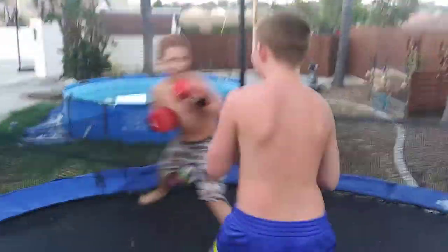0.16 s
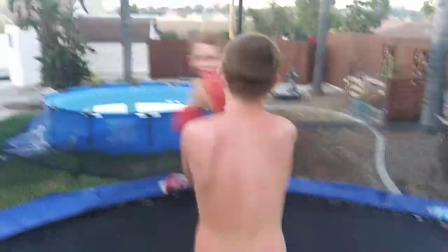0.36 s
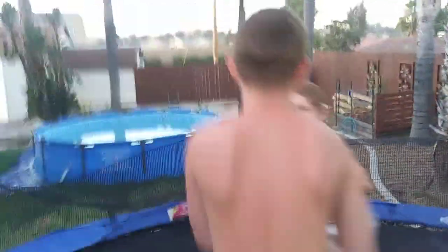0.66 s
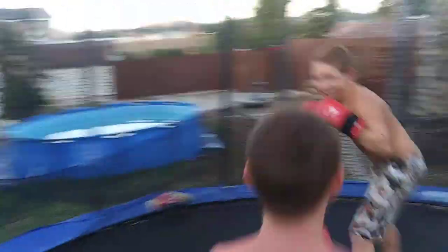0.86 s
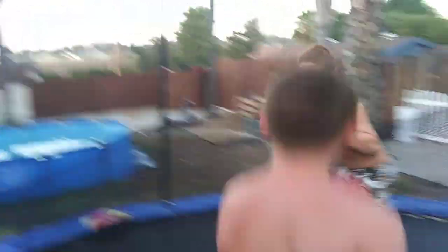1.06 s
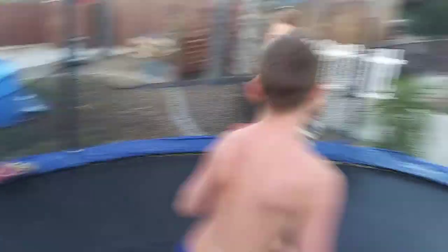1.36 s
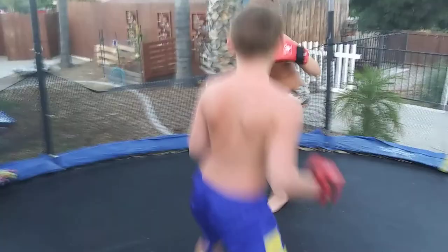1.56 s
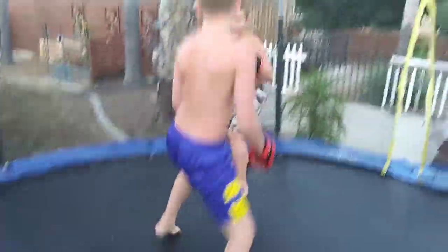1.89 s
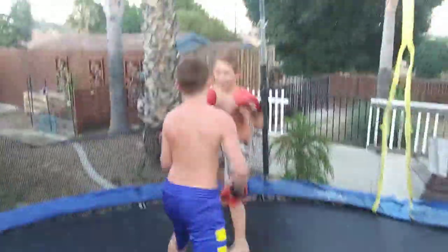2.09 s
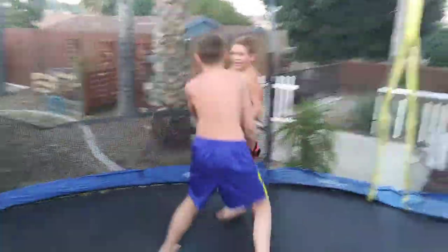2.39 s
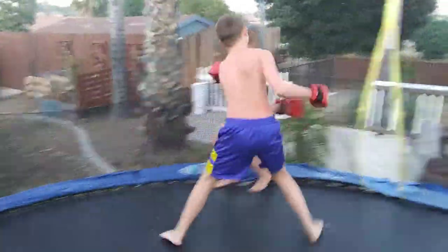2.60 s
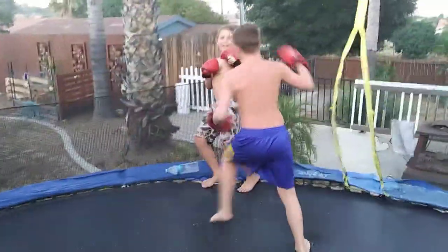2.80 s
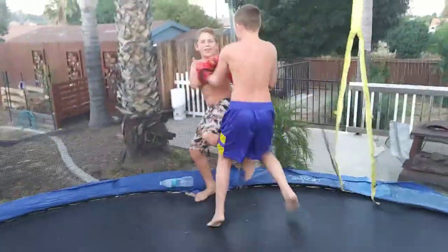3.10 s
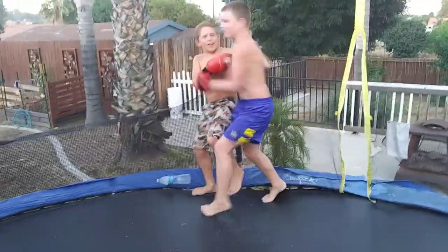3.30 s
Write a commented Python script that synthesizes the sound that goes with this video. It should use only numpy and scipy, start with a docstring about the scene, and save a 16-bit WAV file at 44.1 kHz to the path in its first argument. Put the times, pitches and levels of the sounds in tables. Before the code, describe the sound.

A trampoline rustles close by throughout, with feet scuffing the mat and springs rattling and ringing irregularly. Brief squeaks come at about 0.2 and 1.1 seconds, a light padded punch at 0.3, and sharp clicks at 0.9 and 2.4. Soft footfalls thud now and then. Boxing gloves hit again around 3 seconds, hardest at 3.3, with faint echoes from the yard.

```python
"""Backyard trampoline, close up: two people spar with boxing gloves.
Feet scuff the woven mat in dense tiny slips and land with soft thuds, over a lasting fine rustle.
Hooks chatter on the frame and stick-slip into squeaks; the steel springs zing and ring on.
A few padded punches ring damped glove modes, the hardest near the end.
Ground and fences return faint echoes."""
import sys
import numpy as np
from scipy import signal
from scipy.fft import rfft, irfft
from scipy.io import wavfile
from scipy.ndimage import map_coordinates

SR = 44100
rng = np.random.default_rng(int(sys.argv[2]) if len(sys.argv) > 2 else 0)


def to_wav(s):
    """Save 16-bit WAV."""
    ch = np.atleast_2d(s).T  # columns
    pcm = np.round(np.clip(ch, -1, 1) * 32767)  # PCM
    wavfile.write(sys.argv[1], SR, pcm.astype(np.int16))


N = 152145
TIME_S = np.arange(N) / SR

# Foot swishes on the mat: start_s, length_s, level_db, treble_db, mid_db
SCUFFS = [(-.02, 0.052, -40, -14, 6.5), (0.058, 0.11, -36.5, -8, 4), (0.215, 0.066, -33.5, -3, 4.5),
          (0.289, 0.063, -39.5, -2, 5), (0.356, 0.028, -31.5, -2.5, 5.5), (0.403, 0.047, -45, 4.5, 5),
          (0.536, 0.06, -44.5, 7, 1), (0.605, 0.057, -34, 2.5, -1.5), (0.756, 0.054, -37, 2, -1),
          (0.844, 0.041, -33, -7, 0), (0.891, 0.034, -33, -1, 1.5), (0.942, 0.051, -36, 1, 1),
          (1.084, 0.1, -38, -6.5, -7), (1.231, 0.058, -37, 3, 2.5), (1.383, 0.042, -34.5, 3, -1.5),
          (1.537, 0.051, -41.5, 8, 5), (1.603, 0.1, -43, 2, 1.5), (1.822, 0.045, -38, 0.5, -2),
          (2.044, 0.25, -43.5, -0.5, 2), (2.151, 0.071, -36.5, 6, 0.5), (2.453, 0.059, -30, 0, 0.5),
          (2.53, 0.055, -35.5, 3, -2), (2.569, 0.054, -27, -4, 3), (2.632, 0.14, -34.5, -1, 2),
          (2.708, 0.12, -33.5, -0.5, -2.5), (2.944, 0.081, -34, -2.5, -2.5), (3.213, 0.11, -42, -3, 5.5),
          (3.32, 0.0097, -28, -3, 1.5), (3.338, 0.074, -46, 4, 10)]
# Spectrum of scuffs, rattles and clicks: freq_hz, level_db
CONTACT_SPECTRUM = [(40, -60), (110, -38.5), (250, -29.5), (500, -15.5), (1000, -5.5), (1800, -1),
                    (2700, 1.5), (3400, -2), (4300, 3), (5700, 2), (6600, -1), (7500, -5.5), (10500, -9),
                    (13000, -16.5), (16000, -24.5)]
# Rustle spectrum: freq_hz, level_db
RUSTLE_SPECTRUM = [(30, -46), (109, -29), (311, -5), (962, 0.5), (1760, 2), (2060, 2.5), (2900, 2.5),
                   (3220, -2.5), (6380, 0.5), (7470, -10), (8520, -7), (16000, -25)]
# Rustle contour: time_s, level_db
RUSTLE_LEVELS = [(0, -41.5), (.35, -43), (.52, -45), (.7, -41.5), (.95, -45.5), (1.05, -46), (1.22, -43),
                 (1.37, -43), (1.525, -48), (1.6, -45.5), (1.95, -46.5), (2.25, -44), (2.38, -43.5),
                 (2.8, -42), (2.9, -45.5), (3.05, -39), (3.19, -46), (3.45, -44)]
# Coil resonances: freq_hz, gain_db
SPRING_MODES = [(980, -2), (1500, -0.5), (1728, -6), (2116, -8), (2848, -3), (3252, 1), (5340, 4),
                (10314, 1.5)]
# Single coils grinding: start_s, length_s, centre_hz, level_db, half_width_ratio
ZINGS = [(.104, 0.029, 2210, -31.5, 0.12), (.106, 0.019, 4120, -35.5, .08), (0.223, 0.045, 4000, -39, .05),
         (0.222, 0.051, 7300, -41.5, 0.092), (0.768, 0.041, 10900, -47, .09),
         (0.858, 0.15, 10800, -46, 0.086), (0.895, 0.026, 2980, -37.5, 0.038),
         (0.892, 0.032, 5270, -34.5, 0.033), (1.245, 0.063, 8100, -40.5, 0.21)]
# Hooks chattering on the frame: start_s, level_db, treble_db, mid_db
RATTLES = [(.107, -32, -3, 2.5), (.484, -36.5, -7, 0), (.851, -32, 4, 5.5), (.864, -29.5, 4.5, -7),
           (1.16, -33.5, 5, -5), (1.537, -41, 4, -4), (1.754, -37.5, -0.5, -24), (1.869, -32, -3, -9),
           (2.032, -28, 3, -1), (2.096, -38.5, 10.5, -6), (2.163, -29, -1, 2), (2.758, -29.5, -12, 0),
           (2.78, -28.5, 4.5, -0.5), (2.821, -33.5, 3, -1), (3.036, -28, 3, -1), (3.086, -30.5, 4, -2),
           (3.356, -32.5, 5, 3), (3.377, -29.5, -2.5, 1.5)]
# Hook stick-slip: start_s, length_s, start_hz, end_hz, level_db, peak_hz, falloff_db_per_octave
SQUEAKS = [(0.179, 0.029, 878, 848, -31.5, 1800, 11.5), (1.089, 0.043, 553, 515, -38.5, 4750, 6.5),
           (1.14, 0.0295, 512, 504, -39.5, 4100, 6.5), (1.979, 0.017, 2400, 2280, -42, 2820, 2)]
# Single dry clicks: start_s, level_db, treble_db, mid_db
CLICKS = [(.2998, -29.5, -1, 12), (.8695, -20.5, 3, -13), (2.3708, -30, -8, -14), (2.4088, -27.5, -7, -22),
          (2.428, -26, -4, -2.5), (2.449, -25.5, -1, 2)]
# Glove contacts: start_s, drive_db, pitch_hz, cutoff_hz
PUNCHES = [(0.3166, -21.5, 476, 1770), (2.95, -27, 750, 1500), (3.0629, -15.5, 1034, 1800),
           (3.0726, -17.5, 700, 1500), (3.2749, -5.5, 712, 3920), (3.2800, -11, 926, 1820),
           (3.2885, -17, 840, 1800), (3.3168, -27.5, 800, 2500), (3.3375, -20.5, 950, 2500)]
# Modes of a glove on skin: pitch_ratio, level_db, t60_s
GLOVE_MODES = [(.88, -4.5, 0.0083), (1.36, -2, 0.0069), (2.1, -10.5, 0.018), (3.7, -12, 0.0053),
               (6.0, 0.5, 0.002)]
# Feet sinking into the mat: start_s, level_db
THUDS = [(.366, -42), (1.245, -42), (2.163, -37.5), (2.196, -43.5), (2.934, -36.5), (3.064, -40)]
# Mat flap spectrum: freq_hz, level_db
THUD_SPECTRUM = [(30, -38), (90, -46), (160, -18.5), (240, -6), (800, -1.5), (1300, -8.5), (2500, -11),
                 (8000, -35)]
# Hollow knock modes: freq_hz, level_db
KNOCK_MODES = [(990, -23), (406, -31)]
# Ground and fence reflections: delay_s, gain_db
ECHOES = [(.0093, -23.5), (0.024, -17.5), (0.048, -15.5)]


def from_db(db):
    """Decibels to gain."""
    return 10 ** (np.asarray(db) / 20)


def unit_rms(x):
    """Scale to rms 1."""
    return x / np.sqrt(np.mean(x ** 2) + 1e-20)


def db_at(spectrum, hz):
    """Interpolate a spectrum over log frequency."""
    knot_hz, knot_db = np.transpose(spectrum)
    return np.interp(np.log(hz + 1), np.log(knot_hz), knot_db)


def wander(x):
    """Smooth random curve, spread about 1, one knot per unit of x."""
    return map_coordinates(rng.standard_normal(4096), [x], order=3, mode="wrap")


def butter(x, cutoff_hz, kind, order=2):
    """Causal low- or high-pass."""
    return signal.sosfilt(signal.butter(order, cutoff_hz, kind, fs=SR, output="sos"), x)


def add(out, start_s, x):
    """Mix x into out at start_s."""
    i = int(round(start_s * SR))
    x = x[max(-i, 0):max(N - i, 0)]
    out[max(i, 0):max(i, 0) + len(x)] += x


def envelope(t, attack_s, hold_until_s, decay_s):
    """Smooth rise, hold, exponential fall."""
    rise = np.sin(np.pi / 2 * np.clip(t / attack_s, 0, 1))
    return rise * np.exp(-np.maximum(t - hold_until_s, 0) / decay_s)


def grains(size, spread_db, rate_hz=7000):
    """Tiny slips: random impulses of either sign."""
    slips = (rng.random(size) < rate_hz / SR) * rng.choice([-1, 1], size)
    strength_db = spread_db * np.clip(rng.standard_normal(size), -2, 2)
    return unit_rms(slips * from_db(strength_db))


def friction(spectrum, spread_db, treble_db=0, mid_db=0):
    """1/3 s of slips, coloured by the surface and varied per contact."""
    size = SR // 3
    hz = np.fft.rfftfreq(size, 1 / SR)
    ripple_db = 2.7 * wander(hz / 140)
    surface = unit_rms(from_db(db_at(spectrum, hz) + ripple_db))
    tilt = [(300, 0), (900, mid_db), (2200, mid_db), (3800, 0), (6000, 0), (10500, treble_db)]
    return irfft(rfft(grains(size, spread_db)) * surface * from_db(db_at(tilt, hz)), size)


def foot_scuffs(flutter_hz=110.5):
    """Feet drag over the weave: each swish swells, flutters and dies."""
    out, t = np.zeros(N), TIME_S[:SR // 3]
    for start_s, length_s, level_db, treble_db, mid_db in SCUFFS:
        gain = from_db(level_db + wander(t * flutter_hz))
        shape = envelope(t, attack_s=0.019, hold_until_s=length_s, decay_s=0.017)
        swish = friction(CONTACT_SPECTRUM, spread_db=3, treble_db=treble_db, mid_db=mid_db)
        add(out, start_s, gain * shape * swish)
    return out


def mat_rustle(split_hz=5960, flicker_hz=40):
    """Mat and net rustle throughout, duller in the lulls."""
    hz = np.fft.rfftfreq(N, 1 / SR)
    colour = from_db(db_at(RUSTLE_SPECTRUM, hz))
    noise = unit_rms(irfft(rfft(grains(N, spread_db=1)) * colour, N))
    treble = irfft(rfft(noise) * hz ** 6 / (hz ** 6 + split_hz ** 6), N)
    level_db = np.interp(TIME_S, *np.transpose(RUSTLE_LEVELS)) + wander(TIME_S * flicker_hz)
    treble_gain = from_db(level_db - level_db.mean())  # doubles the treble's swing in dB
    return from_db(level_db) * (noise - treble + treble * treble_gain)


def spring_ring(drive, bandwidth_hz=15.7):
    """Steel coils ring on after whatever shakes them."""
    out = np.zeros(N)
    radius = np.exp(-np.pi * bandwidth_hz / SR)
    feedforward = np.array([1, 0, -1]) * (1 - radius ** 2) / 2
    for freq_hz, gain_db in SPRING_MODES:
        feedback = [1, -2 * radius * np.cos(2 * np.pi * freq_hz / SR), radius ** 2]
        out += from_db(gain_db) * signal.lfilter(feedforward, feedback, drive)
    return out


def spring_zings():
    """A coil grinds on its hook: tiny slips ring one resonance of the steel."""
    out, t = np.zeros(N), TIME_S[:SR // 3]
    hz = np.fft.rfftfreq(len(t), 1 / SR)
    for start_s, length_s, centre_hz, level_db, half_width_ratio in ZINGS:
        resonance = 1 / (1 + ((hz / centre_hz - 1) / half_width_ratio) ** 2)
        ring = irfft(rfft(grains(len(t), spread_db=0)) * resonance, len(t))
        shape = envelope(t, attack_s=0.0033, hold_until_s=length_s, decay_s=0.0044)
        shape_rms = np.sqrt(np.mean(shape ** 2))
        add(out, start_s, from_db(level_db) * shape_rms * unit_rms(ring * shape))
    return butter(out, 222, "high")


def hook_chatter(bursts, attack_s, hold_until_s, decay_s):
    """Hooks hit the frame in short bursts of hard contacts."""
    out, shape = np.zeros(N), envelope(TIME_S[:SR // 3], attack_s, hold_until_s, decay_s)
    for start_s, level_db, treble_db, mid_db in bursts:
        contacts = friction(CONTACT_SPECTRUM, spread_db=0, treble_db=treble_db, mid_db=mid_db)
        add(out, start_s, from_db(level_db) * shape * contacts)
    return butter(out, 222, "high", order=4)


def hook_squeaks(jitter_ratio=0.013, jitter_hz=400, top_hz=7300):
    """A hook sticks and slips: a harmonic tone swells as its pitch sags."""
    out, t = np.zeros(N), TIME_S[:SR // 8]
    for start_s, length_s, start_hz, end_hz, level_db, peak_hz, falloff_db_per_octave in SQUEAKS:
        glide_hz = np.interp(t, [0, length_s], [start_hz, end_hz])
        pitch_hz = glide_hz * (1 + jitter_ratio * wander(t * jitter_hz))
        phase = 2 * np.pi * np.cumsum(pitch_hz) / SR
        tone = np.zeros(len(t))
        for k in range(1, 12):
            octaves = np.log2(k * start_hz / peak_hz)
            drop_db = falloff_db_per_octave * max(-octaves, 2 * octaves)  # twice as steep above the peak
            partial = from_db(rng.normal(0, 2) - drop_db) * np.sin(k * phase + rng.uniform(0, 2 * np.pi))
            if k * start_hz < top_hz:
                tone += partial
        shape = envelope(t, attack_s=length_s / 2, hold_until_s=length_s, decay_s=0.0043)
        add(out, start_s, from_db(level_db) * unit_rms(tone) * shape)
    return out


def glove_punches():
    """A padded blow rings a few heavily damped modes, each blow muffled by its own low-pass."""
    out, t = np.zeros(N), TIME_S[:SR // 10]
    for start_s, drive_db, pitch_hz, cutoff_hz in PUNCHES:
        pop = sum(from_db(level_db - 60 * t / t60_s) * np.sin(2 * np.pi * pitch_hz * pitch_ratio * t)
                  for pitch_ratio, level_db, t60_s in GLOVE_MODES)
        padded = butter(pop, cutoff_hz, "low")
        add(out, start_s, from_db(drive_db) * butter(padded, 480, "high", order=5))
    return out


def mat_thuds():
    """The mat flaps dully under a landing foot."""
    out = np.zeros(N)
    shape = envelope(TIME_S[:SR // 3], attack_s=0.0035, hold_until_s=0.015, decay_s=0.011)
    for start_s, level_db in THUDS:
        add(out, start_s, from_db(level_db) * shape * friction(THUD_SPECTRUM, spread_db=3))
    return out


def hollow_knock(start_s=0.367):
    """Two damped modes, as of the tube frame shifting under a landing."""
    out, t = np.zeros(N), TIME_S[:SR // 10]
    tone = sum(from_db(level_db) * np.sin(2 * np.pi * freq_hz * t) for freq_hz, level_db in KNOCK_MODES)
    add(out, start_s, tone * envelope(t, attack_s=0.0038, hold_until_s=0.0038, decay_s=0.0039))
    return out


def yard_echoes(direct):
    """Direct sound plus duller reflections off ground and fences."""
    out, dull = direct.copy(), butter(direct, 10300, "low")
    for delay_s, gain_db in ECHOES:
        add(out, delay_s, from_db(gain_db) * dull)
    return out


def scene():
    """Mat, springs and gloves in the open yard, mono."""
    rattles = hook_chatter(RATTLES, attack_s=0.0012, hold_until_s=0.0041, decay_s=0.011)
    clicks = hook_chatter(CLICKS, attack_s=0.00048, hold_until_s=0.00027, decay_s=0.0028)
    shake = foot_scuffs() + rattles + clicks
    rustle = mat_rustle()
    direct = shake + spring_zings() + mat_thuds() + hollow_knock() + glove_punches() + hook_squeaks()
    return (yard_echoes(direct) + rustle + spring_ring(shake + rustle))[None]


def record(dry, cutoff_hz=15900):
    """Steep low-pass."""
    return signal.sosfilt(signal.ellip(12, 0.1, 80, cutoff_hz, fs=SR, output="sos"), dry)


dry = scene()
out = record(dry)
to_wav(out)
```